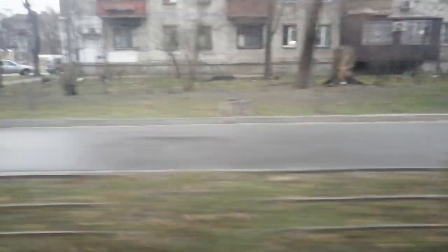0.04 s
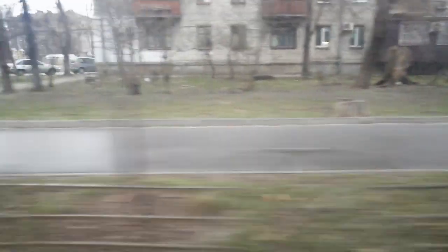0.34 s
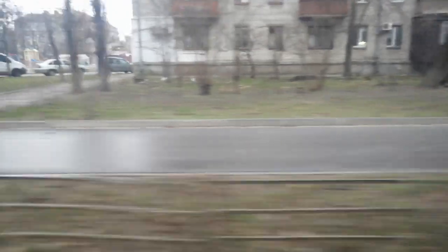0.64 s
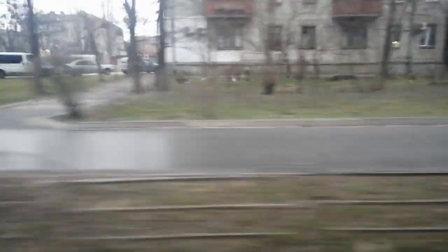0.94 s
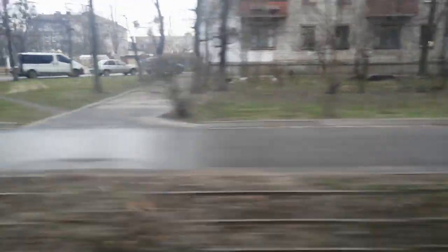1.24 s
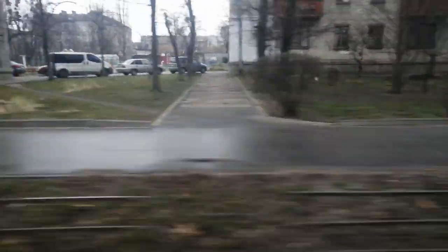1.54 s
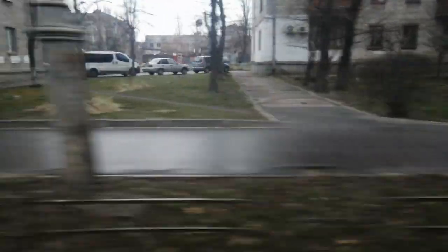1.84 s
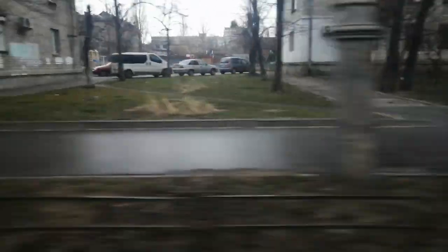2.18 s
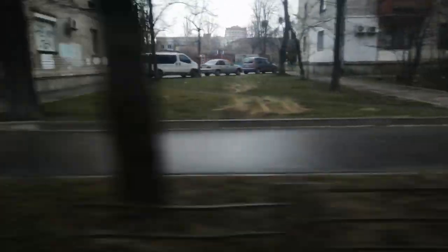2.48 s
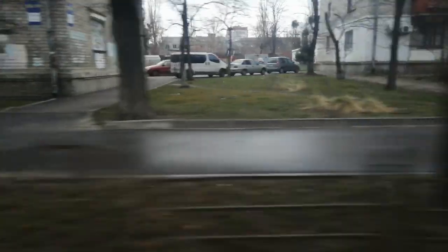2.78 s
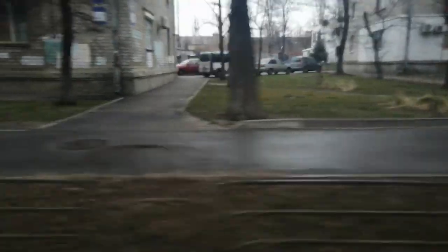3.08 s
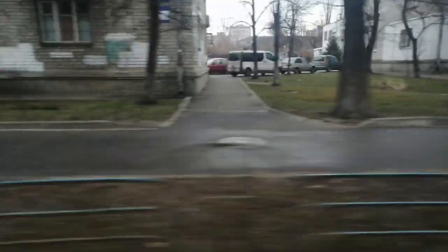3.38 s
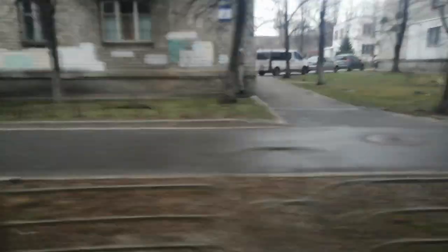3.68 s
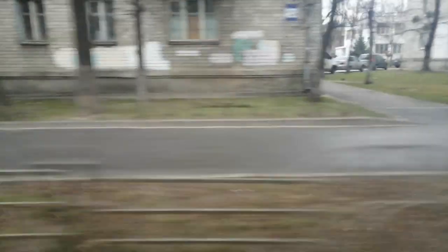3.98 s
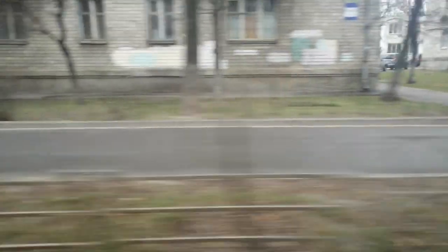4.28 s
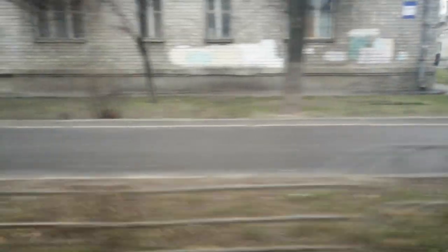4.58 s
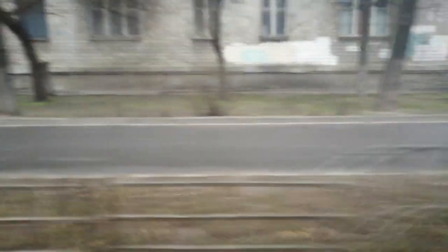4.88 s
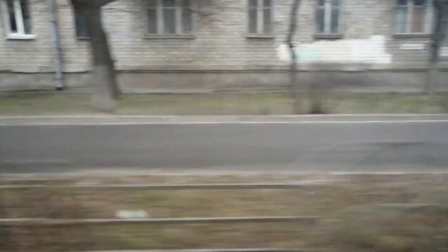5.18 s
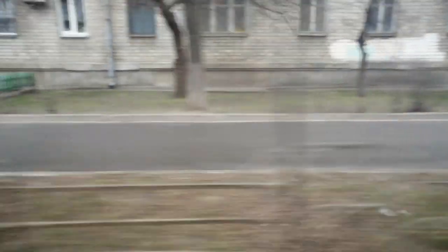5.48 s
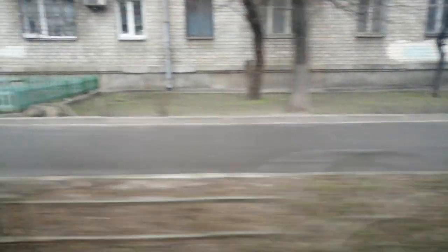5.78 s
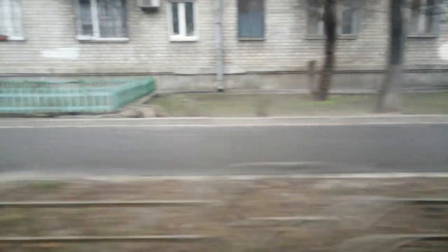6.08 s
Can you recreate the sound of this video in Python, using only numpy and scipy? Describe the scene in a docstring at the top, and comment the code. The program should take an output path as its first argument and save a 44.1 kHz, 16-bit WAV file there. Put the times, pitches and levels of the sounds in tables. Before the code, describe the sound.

Heard from a window seat in a trolleybus, a deep road rumble runs under rattling panels and soft suspension thumps. An air compressor throbs and ticks lightly, then fades back. The electric brake sets in with an even whine and a thin, flickering squeal, while the transmission drone falls in pitch and booms in the cabin. Rough patches bring louder knocks and window clacks in the second half, ending over a low hum.

```python
"""Inside a trolleybus on a worn, damp city road. Tyres rumble and hiss; over the bumps loose panels
knock, a window clacks and the suspension thumps. An air compressor throbs and ticks, then fades back.
The electric brake comes in with a steady 900 Hz whine and a faint squeal, while the drone of the
transmission sinks with the speed and booms in the cabin. As the bus slows, the floor starts to hum."""
import sys
import numpy as np
from scipy import signal
from scipy.fft import rfft, irfft
from scipy.io import wavfile
from scipy.ndimage import uniform_filter1d

SR = 44100
rng = np.random.default_rng(int(sys.argv[2]) if len(sys.argv) > 2 else 0)


def materialize(psi):
    """Save the field psi as 16-bit PCM at rate SR to the path in sys.argv[1].

    A 1-D psi becomes a single channel; in a 2-D psi each row is a channel.
    """
    bounded = np.clip(np.atleast_2d(psi).T, -1, 1)
    quanta = np.round(bounded * 32767).astype(np.int16)
    wavfile.write(sys.argv[1], SR, quanta)


N = 279153
TIME = np.arange(N) / SR
EAR_DELAY_S, TOP_HZ = .00042, 15750
BRAKE_ON_S, BRAKE_RISE_S, BRAKE_OFF_S, BRAKE_FALL_S = 2.288, 0.41, 6.14, 0.35

# stereo width of the noise beds: (frequency [Hz], left-right correlation [clipped to 0-1 in use])
STEREO_LIKENESS = [(30, 5.5), (120, 1), (250, 0.7), (500, 0.72), (1000, -0.51), (2000, -0.74), (4000, -3.7),
                   (15000, -0.1)]
# stereo lean of the noise beds: (frequency [Hz], left minus right [dB])
STEREO_BALANCE = [(30, 9.5), (120, -4), (300, 2.5), (600, 3.5), (1000, 3), (2000, 3.5), (3000, -0.5),
                  (4500, -8), (6000, -7.5), (9000, 0), (14500, -6)]
# colour of the tyre rumble in the cabin: (frequency [Hz], relative density [dB])
RUMBLE_SPECTRUM = [(15, -18.5), (28, -6), (45, -13.5), (66, -8.5), (95, -10.5), (115, -6), (135, -13),
                   (175, -8.5), (198, -15), (230, -14.5), (290, -15), (328, -13), (400, -23), (520, -23.5),
                   (575, -20.5), (625, -25), (760, -24.5), (880, -30.5), (1100, -32.5), (1250, -39),
                   (1450, -42), (1750, -42.5), (2100, -49.5), (2650, -48), (3300, -85.5), (4200, -74),
                   (8800, -120)]
# rough patches of road: (time [s], half length [s], lift over plain asphalt [dB])
ROUGH_PATCHES = [(.39, .12, 4), (1.56, .1, 3), (3.12, .25, 3.5), (3.92, .17, 5), (4.3, .18, 2.5),
                 (4.85, .26, 6.5), (5.1, .08, 8), (6.27, .17, 5.5)]
# colour of tyre spray on damp asphalt: (frequency [Hz], relative density [dB])
SPRAY_SPECTRUM = [(2000, 0.5), (2700, 8), (3400, -1), (4000, -7), (4600, -3.5), (5300, -2.5), (6400, -10.5),
                  (7800, -19.5), (10500, -21.5), (13500, -19), (14700, -12.5), (16000, -26)]
# dampness of the asphalt: (time [s], hiss level [dB])
DAMPNESS = [(0, -61), (2.3, -62), (3.6, -64.5), (4.8, -65), (6.33, -62.5)]
# puddles: (time [s], half length [s], extra hiss [dB])
PUDDLE_SWELLS = [(.37, .07, 0.5), (5.03, 0.14, 5), (5.28, 0.099, 3.5)]
# load on the compressor: (time [s], throb level [dB])
COMPRESSOR_LOAD = [(0, -31.5), (.7, -38.5), (1, -33.5), (1.95, -31), (2.7, -32.5), (3.2, -37.5),
                   (4.4, -35.5), (4.6, -44), (6.33, -51.5)]
# ring of the compressor's valve: (frequency [Hz], relative level [dB], t60 [s])
VALVE_MODES = [(2750, -0.5, .015), (3545, 5.5, 0.023), (4496, 5.5, 0.03), (4800, 2.5, .024),
               (5150, -0.5, .012)]
# spells of loud valve ticking: (time [s], half length [s], lift over the quiet tick [dB])
TICK_SPELLS = [(.03, 0.05, 20), (.32, 0.054, 16), (.75, 0.14, 9), (.95, 0.12, 12.5), (1.32, 0.14, 15.5),
               (1.8, 0.058, 9), (2.04, 0.08, 11), (2.4, .16, 13)]
# big knocks of the body: (time [s], level [dB], thump offset [dB], crack offset [dB], rattle t60 [s])
BODY_KNOCKS = [(.211, -32, -9, -14, 0.035), (.265, -30.5, 5.5, -16.5, .055), (.316, -33.5, -1, -13, 0.036),
               (.372, -35.5, 8, -14, 0.06), (.403, -26.5, -3.5, -10.5, 0.051), (.415, -29, 2.5, -14, 0.039),
               (.469, -40.5, 12, -28, 0.053), (.517, -32, 5, -19, 0.075), (.555, -30, -2, -22, 0.08),
               (.669, -31.5, 8, -12, 0.043), (1.629, -29, 2, -20, 0.024), (3.031, -29.5, 8, -17, 0.039),
               (3.124, -36.5, 10, -14.5, 0.042), (3.222, -37, 10, -18, .06),
               (3.314, -25, 1.5, -24.5, 0.096), (3.71, -28.5, 6, -19, 0.066), (3.799, -17.5, 2, -17, 0.058),
               (3.839, -26, 1, -21, 0.043), (3.873, -27.5, -0.5, -27, .04), (3.883, -33, -6, -8, .03),
               (3.889, -25, -0.5, -10, 0.061), (3.931, -31.5, 9, -22, .07), (3.97, -28, 8.5, -14.5, 0.055),
               (4.154, -31, 6.5, -13, 0.067), (4.255, -27, -7, -17, 0.13), (4.291, -28.5, -1, -18, 0.12),
               (4.346, -29.5, -4.5, -16, 0.039), (4.599, -33, 7, -20, 0.025), (4.653, -27, 1.5, -30, 0.053),
               (4.746, -30.5, 4, -13.5, 0.032), (4.791, -24.5, 0.5, -13.5, 0.052),
               (4.83, -29, -3, -18, 0.024), (4.861, -35, 7, -24, 0.039), (4.909, -25.5, 6, -14, 0.033),
               (4.967, -23, 6.5, -12, .055), (4.989, -30, 5, -9.5, .029), (5.015, -25, 6, -14, 0.046),
               (5.048, -30.5, -8.5, -10, 0.086), (5.06, -27.5, 1, -13, 0.045),
               (5.072, -20.5, -1.5, -6, 0.066), (5.111, -29.5, -1, -21, 0.023), (5.153, -31, 8, -22, 0.039),
               (5.168, -23.5, 3, -15, 0.055), (5.195, -30.5, 5.5, -6.5, 0.037),
               (5.207, -28.5, 3, -18, 0.061), (5.258, -30, 4, -9.5, 0.041), (5.5, -24.5, -8.5, -15, 0.046),
               (5.542, -30, -7.5, -25, 0.031), (6.055, -36, 6.5, -19, 0.035),
               (6.097, -32.5, -1, -23, 0.022), (6.181, -26, -1, -22.5, 0.072),
               (6.277, -28.5, -3, -36, 0.037)]
# ring of the panels: (frequency [Hz], relative level [dB], t60 [s])
PANEL_MODES = [(139, -7, 0.089), (195, -9, 0.15), (253, -2.5, 0.34), (278, -4, 0.016), (327.6, 4, 0.052),
               (389, -16.5, 0.12), (510, -2, 0.039), (766, -11.5, 0.024), (775, -4.5, 0.039),
               (917, -7.5, 0.05), (1114, -9, 0.099)]
# a knock's floor thump, panel clack, frame crack and bright edge: (low [Hz], high [Hz], decay [x rattle])
KNOCK_BANDS = [(140, 446, 1.3), (409, 1270, 0.94), (1470, 2150, 0.92), (2180, 3000, 1.1)]
# dry clacks, of a loose window and at the start of the hardest knocks: (time [s], level [dB], crack offset
# [dB], left minus right [dB])
DRY_CLACKS = [(0.3568, -26.5, -1.5, -8), (0.4032, -23, -14, -4), (1.6228, -20.5, -8.5, -3),
              (3.7838, -14.5, -4, -1.5), (4.0501, -18, -25, 0.5), (4.9088, -22.5, -8, -5),
              (5.003, -23.5, -3.5, -10), (5.0723, -16.5, -14, 2), (5.0991, -24, -1, -6.5)]
# thumps of the suspension: (time [s], level [dB], pitch [Hz])
SUSPENSION_THUMPS = [(.371, -17, 329), (.402, -21, 120), (0.669, -25.5, 320), (.975, -23.5, 230),
                     (1.628, -21, 278), (2.07, -22, 241), (3.032, -23, 310), (3.122, -27, 286),
                     (3.356, -18, 230), (3.811, -15, 185), (3.977, -19.5, 230), (4.745, -18.5, 343),
                     (5.108, -18.5, 166)]
# ring of the floor in a thump: (frequency [x thump pitch], relative level [dB])
FLOOR_MODES = [(0.658, -7.5), (1, 0), (1.421, -10.5)]
# motor casing resonances that sing under braking: (frequency [Hz], width [Hz], relative level [dB])
CASING_RESONANCES = [(536, 70, -10.5), (826, 170, -10), (899, 170, -5), (1095, 60, -15), (1847, 66, -24.5)]
# brief dips in the brake's tone: (time [s], half length [s], level change [dB])
TONE_DIPS = [(2.9, 0.037, -5), (3.88, 0.046, -7), (4.12, .09, -2), (4.66, 0.049, -2.5), (4.92, 0.34, -5)]
# flares of squeal: (time [s], half length [s], lift over the quiet squeal [dB], pitch [Hz])
SQUEAL_FLARES = [(2.787, .03, 19, 2660), (2.873, 0.054, 22, 2650), (2.93, .04, 9, 2705),
                 (2.998, 0.033, 18, 2650), (3.047, 0.029, 17, 2730), (4.251, .08, 14, 2570),
                 (5.14, .025, 23, 2660), (5.247, 0.033, 15, 2633), (5.333, .04, 21.5, 2630),
                 (5.445, .05, 21, 2670), (5.58, 0.045, 7, 2695), (5.724, 0.067, 12, 2735)]
# spells of high buzz under braking: (time [s], half length [s], lift over the steady buzz [dB])
BUZZ_SPELLS = [(2.86, 0.17, 7), (3.08, .14, 6), (4.25, .08, 4.5), (5.42, 0.51, 6.5)]
# standing waves of the cabin: (frequency [Hz], width [Hz], level [dB], left minus right [dB])
CABIN_MODES = [(176.8, 6, -30.5, -6), (171.1, 2.5, -27.5, 15), (156.17, 3.5, -24, 7),
               (151.6, 1.1, -27.5, 4), (146.5, 4.8, -28, -7)]
# sharp clicks of fittings: (time [s], level before filtering [dB], low [Hz], high [Hz], t60 [s])
FITTING_CLICKS = [(3.108, -44, 3800, 5530, .02), (4.121, -45.5, 4760, 5950, 0.1),
                  (4.915, -52, 4470, 14930, 0.011), (4.986, -42.5, 3000, 6500, 0.017),
                  (5.003, -39, 3000, 6500, .02), (5.022, -49, 3490, 15500, .007),
                  (5.054, -42, 4100, 5200, .04), (5.075, -44.5, 3300, 5600, 0.037),
                  (5.101, -46.5, 3000, 6040, .02), (5.142, -43, 4410, 4680, 0.13),
                  (5.195, -58.5, 4400, 6400, 0.067), (5.255, -54.5, 4970, 6500, .1)]


def amp(db):
    """Decibels to gain."""
    return 10 ** (np.asarray(db) / 20)


def pan(db):
    """Left and right gains for a left-minus-right level."""
    return amp(np.array([[.5], [-.5]]) * db)


def automation(rows):
    """A fader ride through (time, level) points."""
    return np.interp(TIME, *np.transpose(rows))


def swells(rows):
    """Bell-shaped rises or dips in dB, summed at every sample."""
    return sum(db * np.exp(-((TIME - s) / half) ** 2) for s, half, db in rows)


def held(on_s, rise_s, off_s, fall_s):
    """A gain that rises from on_s, holds at one and is gone by off_s."""
    return np.clip(np.minimum((TIME - on_s) / rise_s, (off_s - TIME) / fall_s), 0, 1)


def wander(rate_hz):
    """Slow random motion with an rms of one."""
    hz = np.fft.rfftfreq(N, 1 / SR)
    drift = irfft(rfft(rng.standard_normal(N)) * np.exp(-(hz / rate_hz) ** 2), N)
    return drift / np.sqrt(np.mean(drift ** 2))


def log_curve(points, hz):
    """A curve through (frequency, value) points on a log-frequency axis."""
    point_hz, value = np.transpose(points)
    return np.interp(np.log(hz + 1), np.log(point_hz), value)


def noise(colour_db):
    """Stereo noise of a given colour, alike in the bass and diffuse in the treble."""
    hz = np.fft.rfftfreq(N, 1 / SR)
    left, other = rfft(rng.standard_normal((2, N)))
    likeness = np.clip(log_curve(STEREO_LIKENESS, hz), 0, 1)
    right = likeness * left + np.sqrt(1 - likeness ** 2) * other
    spectrum = np.array([left, right]) * pan(log_curve(STEREO_BALANCE, hz))
    bed = irfft(spectrum * amp(colour_db(hz)), N)
    return bed / bed.mean(0).std()


def noise_band(centre_hz, width_hz):
    """Noise in one steep-sided resonance."""
    return noise(lambda hz: -20 * np.log10(1 + (2 * (hz - centre_hz) / width_hz) ** 2))


def crossover(x, edge_hz):
    """The parts of a sound below and above an edge."""
    low = signal.sosfiltfilt(signal.butter(2, edge_hz, fs=SR, output="sos"), x)
    return low, x - low


def bandpass(x, low_hz, high_hz, order=4):
    """A steep band-pass."""
    return signal.sosfilt(signal.butter(order, [low_hz, high_hz], "band", fs=SR, output="sos"), x)


def ring(modes, t, detune):
    """A sum of decaying modes; every blow lands elsewhere and shifts them a little."""
    hz, db, t60 = np.transpose(modes)[:, :, None]
    hz = hz * (1 + detune * rng.standard_normal(hz.shape))
    return (amp(db - 60 * t / t60) * np.sin(2 * np.pi * hz * t)).sum(0)


def arrive(sound, bearing_rad, shadow_hz=700):
    """Delays a sound by EAR_DELAY_S and offsets its treble between the ears; bearing zero is left."""
    hz = np.fft.rfftfreq(sound.shape[1], 1 / SR)
    treble = 1 - 1 / (1 + (hz / shadow_hz) ** 4)
    late_s = np.array([[0], [1]]) * EAR_DELAY_S * np.cos(bearing_rad) * treble
    return irfft(rfft(sound) * np.exp(-2j * np.pi * hz * (late_s + EAR_DELAY_S)))


def add(mix, s, sound):
    """Mixes a stereo sound in at time s."""
    part = mix[:, max(round(s * SR), 0):][:, :sound.shape[1]]
    part += sound[:, :part.shape[1]]


def tyres(rumble_db=-35, asphalt_db=3.0, bass_share=0.58, body_share=0.92, jolt_db=2.0, flicker_db=1.3):
    """Tyre rumble swells on rough patches, the deep bass less so; spray hisses and lifts in puddles."""
    rough_db = asphalt_db + swells(ROUGH_PATCHES)
    bass, body = crossover(noise(lambda hz: log_curve(RUMBLE_SPECTRUM, hz)), 110)
    rumble = bass * amp(bass_share * rough_db) + body * amp(body_share * rough_db + jolt_db * wander(34))
    spray_db = automation(DAMPNESS) + swells(PUDDLE_SWELLS) + flicker_db * wander(22)
    spray = noise(lambda hz: log_curve(SPRAY_SPECTRUM, hz))
    return amp(rumble_db) * rumble + amp(spray_db) * spray


def compressor(stroke_hz=27, start_s=.0147, tick_db=-72, uneven_db=2.0, jitter_s=0.0023,
               bounce_s=0.0076, bounce_db=-9):
    """Each piston stroke pushes on the cabin air and snaps a valve shut, which bounces on its seat."""
    rate_hz = stroke_hz * (1 + 0.0014 * wander(13)) * (TIME > start_s)
    strokes = np.cumsum(rate_hz) / SR
    throb_db = automation(COMPRESSOR_LOAD) - 0.5 * wander(4.6)
    throb = np.sqrt(2) * np.sin(2 * np.pi * strokes) * amp(throb_db)
    ticks, t = np.zeros((2, N)), np.arange(1200) / SR
    valve_db = tick_db + swells(TICK_SPELLS)
    for i in np.flatnonzero(np.diff(np.floor(strokes))):
        ping = .5 * ring(VALVE_MODES, t, detune=0.0091)
        burst = 2.7 * rng.standard_normal((2, len(t))) * amp(-60 * t / 0.013)
        s = i / SR + jitter_s * rng.standard_normal()
        snap = (ping + burst) * amp(valve_db[i] + uneven_db * rng.standard_normal())
        add(ticks, s, snap)
        add(ticks, s + bounce_s * rng.uniform(0.56, 2.4), snap[::-1] * amp(bounce_db))  # sides swapped
    return throb * pan(2.5) + bandpass(ticks, 3000, 5600) * pan(-12)


def knock(db, thump_db, crack_db, rattle_s, chatter=0.076, width=1.34, ring_db=-30, soft_hz=520):
    """A blow and the chatter after it shake the panels: heavy blows boom, hard ones crack."""
    out, t = np.zeros((2, 6000)), np.arange(6000) / SR
    panel = amp(ring_db) * ring(PANEL_MODES, t, detune=0.059)
    panel *= amp(-30 * t / rattle_s)  # a tight part damps the panel
    panel[0] += 1  # the dry contact itself
    panel = signal.sosfilt(signal.butter(1, soft_hz, fs=SR, output="sos"), panel)  # padded joints dull it
    bands_db = (thump_db + 1, 0.23, crack_db - 3.6, crack_db - 13)  # thump, clack, crack, edge
    for (low_hz, high_hz, decay), band_db in zip(KNOCK_BANDS, bands_db):
        contact = rng.standard_normal(len(t)) + width * rng.standard_normal((2, len(t)))
        contact *= chatter * amp(-60 * t / (decay * rattle_s))
        contact[:, 0] += 1
        shaken = signal.fftconvolve(contact, panel[None], axes=1)[:, :len(t)]
        layer = bandpass(shaken, low_hz, high_hz)
        peak_rms = np.sqrt(uniform_filter1d((layer ** 2).mean(0), size=200).max())
        out += amp(db + band_db) * layer / peak_rms
    return out


def bodywork(rattle_count=80, rattle_db=-46.5, scatter_db=0.5, scatter_rad=0.23):
    """Big knocks at the bumps, and small rattles from the wall that crowd and grow on rough patches."""
    out, rough_db = np.zeros((2, N)), swells(ROUGH_PATCHES)
    for s, *blow in BODY_KNOCKS:
        hit = arrive(knock(*blow), bearing_rad=1.8 + scatter_rad * rng.standard_normal())
        add(out, s - EAR_DELAY_S, hit * pan(-2))
    shaking = np.cumsum(amp(rough_db))  # one rattle in each equal share of the shaking
    shares = (np.arange(rattle_count) + rng.random(rattle_count)) / rattle_count
    onsets = np.searchsorted(shaking, shaking[-1] * shares)
    for i, (size, turn) in zip(onsets, rng.standard_normal((rattle_count, 2))):
        rattle = knock(rattle_db + rough_db[i] + scatter_db * size, thump_db=3.5, crack_db=-18,
                       rattle_s=.045)
        add(out, i / SR, arrive(rattle, bearing_rad=.1 + scatter_rad * turn) * pan(4.5))
    return out


def dry_clacks(body_hz=(400, 1100), crack_hz=(1650, 2600), bounce_s=0.0056, bounce_db=-11):
    """A hard, dry clack, of a pane in its frame or opening a hard knock, settles with a small bounce."""
    out, impulse = np.zeros((2, N)), signal.unit_impulse(1500)
    body, crack = bandpass(impulse, *body_hz, order=3), bandpass(impulse, *crack_hz)
    body, crack = body / abs(body).max(), crack / abs(crack).max()
    for s, db, crack_db, side_db in DRY_CLACKS:
        clack = amp(db) * (body + amp(crack_db) * crack) * pan(side_db)
        add(out, s - EAR_DELAY_S, arrive(clack, bearing_rad=1.2))
        add(out, s + bounce_s * rng.uniform(.5, 2), amp(bounce_db) * clack[::-1])
    return crossover(out, 4500)[0]


def suspension(trim_db=-2.0, rise_s=0.0063):
    """A wheel drops into a dip: the springs pass on a soft push, and the floor rings for a few cycles."""
    out, t = np.zeros((2, N)), np.arange(4000) / SR
    push = t / rise_s * np.exp(1 - t / rise_s)
    for s, db, hz in SUSPENSION_THUMPS:
        floor = sum(amp(mode_db) * np.sin(2 * np.pi * (ratio * hz * t + rng.random()))
                    for ratio, mode_db in FLOOR_MODES)
        add(out, s, amp(db + trim_db) * push * floor * pan(6.5))
    return out


def brake_whine(whine_hz=899, waver=0.00494, whine_db=-39, sag_db_per_s=0.67, octave_db=-21,
                casing_db=-4.5):
    """Ripple in the braking current makes the motor whine and excites its casing."""
    phase = 2 * np.pi * np.cumsum(whine_hz * (1 + waver * wander(17))) / SR
    phase = phase + np.array([[1.0], [0]])  # the left leads by a radian
    shimmer = amp(0.1 * np.array([wander(4.4), wander(33)]))
    octave = amp(octave_db + 2.0 * wander(25)) * np.sin(2 * phase)
    tone = np.sqrt(2) * (np.sin(phase) + octave) * shimmer * amp(swells(TONE_DIPS))
    casing = sum(amp(db) * noise_band(hz, width) for hz, width, db in CASING_RESONANCES)
    whine = tone * pan(5) + amp(casing_db) * casing * pan(5.2)
    fader_db = whine_db - sag_db_per_s * (TIME - BRAKE_ON_S)  # eases off as the bus slows
    return whine * amp(fader_db) * held(BRAKE_ON_S, BRAKE_RISE_S, BRAKE_OFF_S, BRAKE_FALL_S)


def brake_squeal(tone_db=-77, waver=0.009, shimmer_db=5.0, flutter_db=3.0):
    """A thin unsteady squeal flares out of a buzz while the bus brakes, sliding between close pitches."""
    s, half, db, hz = np.transpose(SQUEAL_FLARES)
    pitch_hz = np.interp(TIME, s, hz) * (1 + waver * wander(35))
    phase = 2 * np.pi * np.cumsum(pitch_hz) / SR
    tone = np.sin(phase) * amp(tone_db + swells(zip(s, half, db)) + shimmer_db * wander(70))
    buzz = noise_band(2645, width_hz=70) * amp(-76) + noise_band(2725, width_hz=160) * amp(-75.5)
    buzz *= amp(swells(BUZZ_SPELLS) + flutter_db * wander(24))
    return (tone + buzz) * pan(4) * held(BRAKE_ON_S, BRAKE_RISE_S, BRAKE_OFF_S, BRAKE_FALL_S)


def transmission(coast_hz=181.2, slow_from_s=2.85, slow_hz_per_s=13.2, drone_db=-35.5, octave_db=-20,
                 shake_db=2.5, gear_order=6.62, gear_db=-55, housing_hz=1090):
    """Under braking the drone sinks through cabin modes, the gear mesh through the housing's ring."""
    shaft_hz = coast_hz - slow_hz_per_s * np.maximum(TIME - slow_from_s, 0)
    jerk = .005 * amp(0.87 * swells(ROUGH_PATCHES)) * wander(20)  # bumps jerk the drive line
    pitch_hz = shaft_hz * (1 + jerk)
    phase = 2 * np.pi * np.cumsum(pitch_hz) / SR
    power = (amp(drone_db) * pan(-5)) ** 2
    for hz, width, db, side_db in CABIN_MODES:  # each booms as the pitch passes
        power = power + (amp(db) * pan(side_db)) ** 2 / (1 + (2 * (shaft_hz - hz) / width) ** 4)
    tone = np.sin(phase) + amp(octave_db) * np.sin(2 * phase)
    drone = tone * np.sqrt(power) * amp(shake_db * wander(36))
    housing = 1 / (1 + ((gear_order * pitch_hz - housing_hz) / 70) ** 4)
    mesh = housing * np.sin(gear_order * phase) * amp(gear_db + 2.2 * wander(21))
    return np.sqrt(2) * (drone + mesh * pan(1.8)) * held(on_s=2.51, rise_s=0.081, off_s=5.93, fall_s=0.063)


def fittings(scoop_db=-11, scoop_hz=9000, scoop_width_hz=2600):
    """Small hard parts click against each other, scooped between their ring and their top edge."""
    out, t = np.zeros((2, N)), np.arange(5000) / SR
    for s, db, low_hz, high_hz, t60 in FITTING_CLICKS:
        burst = rng.standard_normal((2, len(t))) * amp(db - 60 * t / t60)
        add(out, s, bandpass(burst, low_hz, high_hz, order=3))
    scoop = np.exp(-((np.fft.rfftfreq(N, 1 / SR) - scoop_hz) / scoop_width_hz) ** 2)
    return irfft(rfft(out) * amp(scoop_db * scoop), N) * pan(-9)


def floor_hum(hum_hz=125, width_hz=9, hum_db=-35):
    """At low speed the floor hums at its lowest resonance."""
    return amp(hum_db) * noise_band(hum_hz, width_hz) * held(on_s=4.8, rise_s=0.28, off_s=6.4, fall_s=0.4)


def cabin(x, t60=0.32, wet_db=-12, predelay_s=.004):
    """Short diffuse reflections from windows and seats."""
    t = np.arange(SR // 3) / SR
    tail = rng.standard_normal((2, len(t))) * amp(-60 * t / t60) * (t > predelay_s)
    tail /= np.linalg.norm(tail[0])
    return x + amp(wet_db) * signal.fftconvolve(x, tail, axes=1)[:, :N]


def scene():
    """The mix from a window seat: a dry bed of road and machinery, with cabin reverb on the hits."""
    bed = tyres() + compressor() + transmission() + floor_hum() + brake_whine() + brake_squeal()
    hits = bodywork() + dry_clacks() + suspension() + fittings()
    return bed + cabin(hits)


def record(dry):
    """A steep high cut on the whole mix."""
    high_cut = signal.firwin(511, TOP_HZ, window=("kaiser", 9), fs=SR)
    return signal.oaconvolve(dry, high_cut[None], "same")


dry = scene()
out = record(dry)
materialize(out)
```